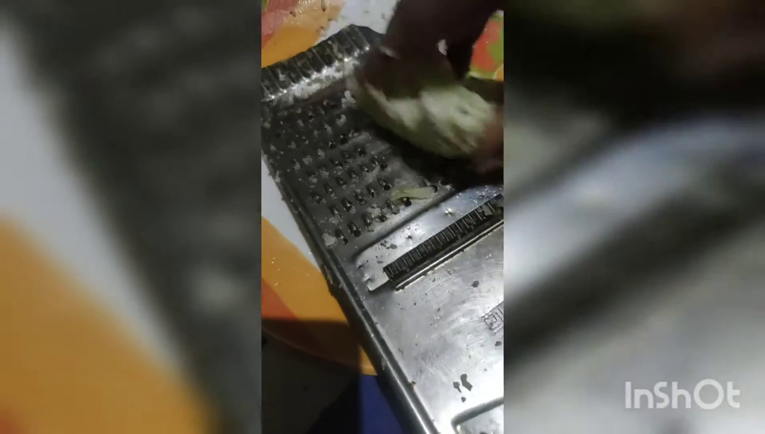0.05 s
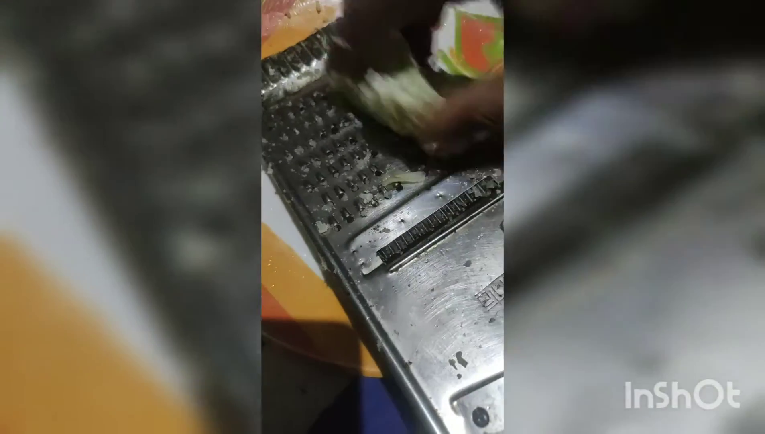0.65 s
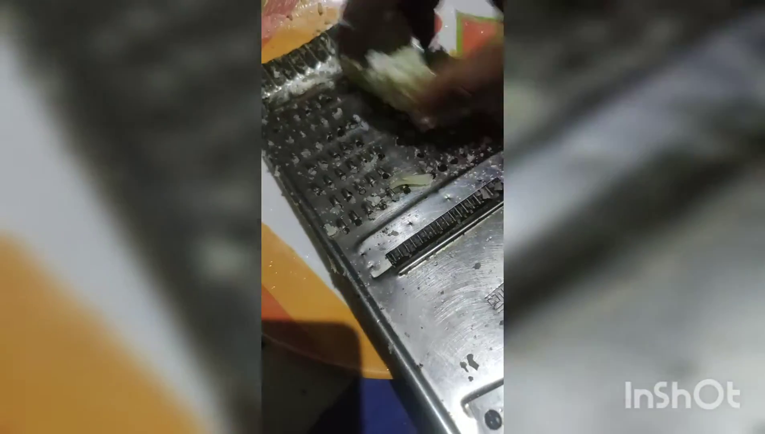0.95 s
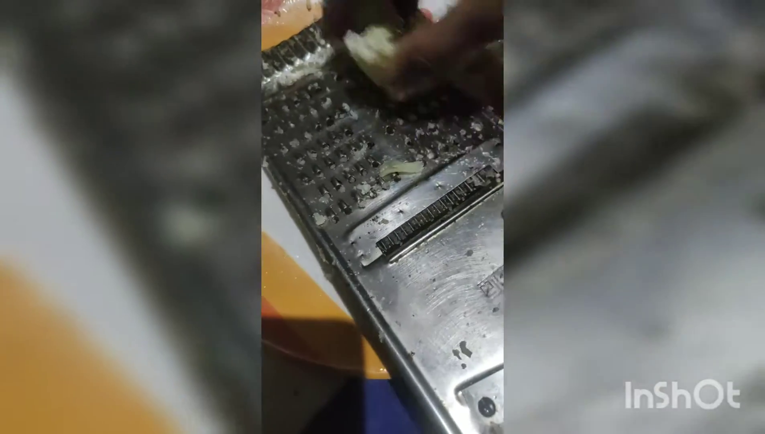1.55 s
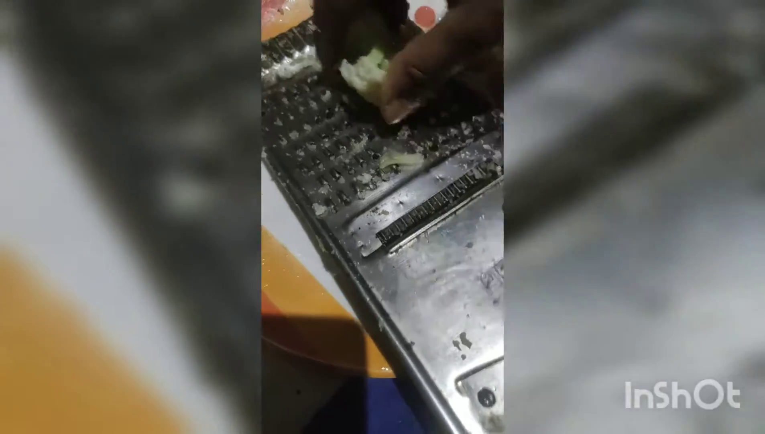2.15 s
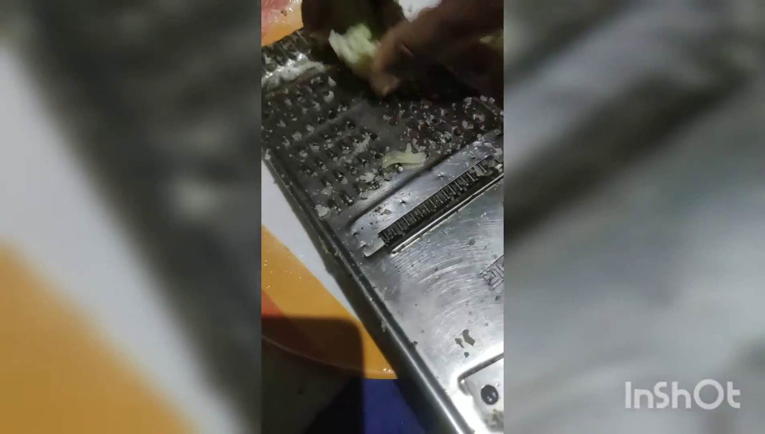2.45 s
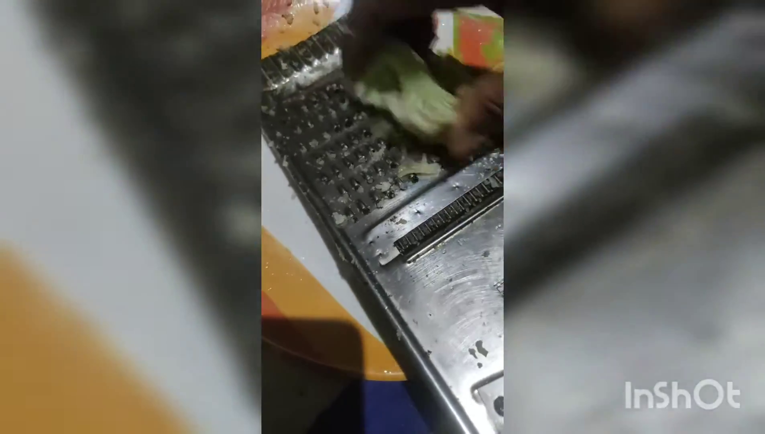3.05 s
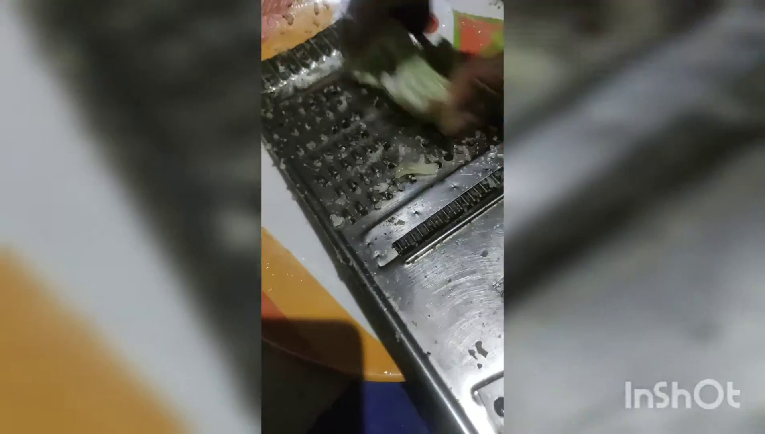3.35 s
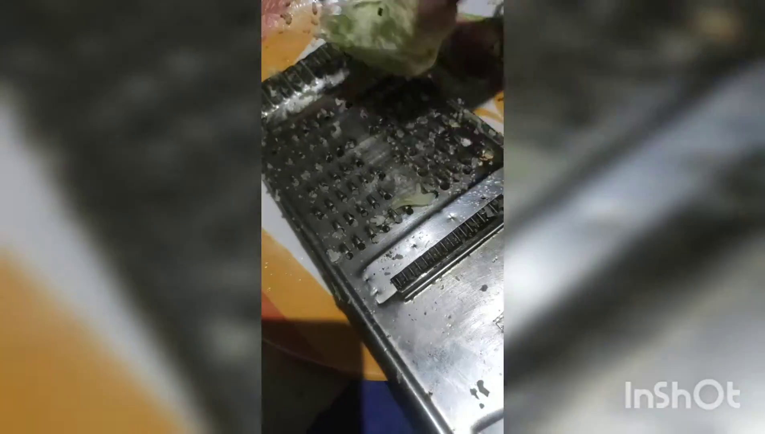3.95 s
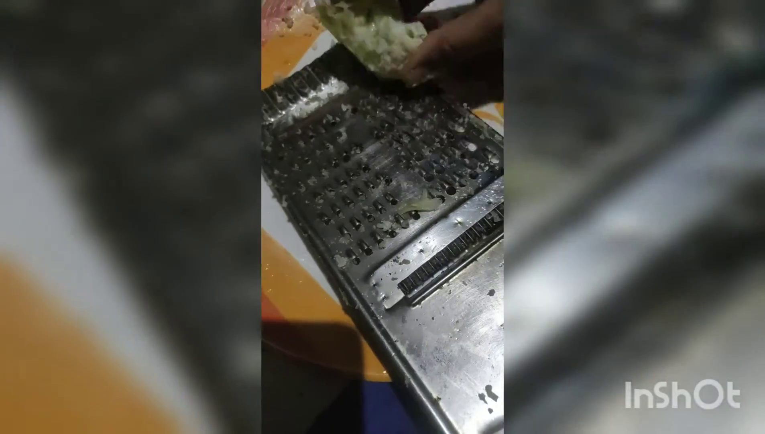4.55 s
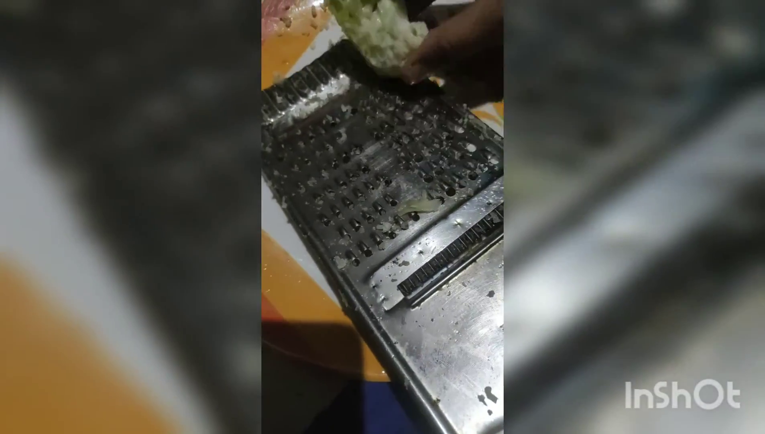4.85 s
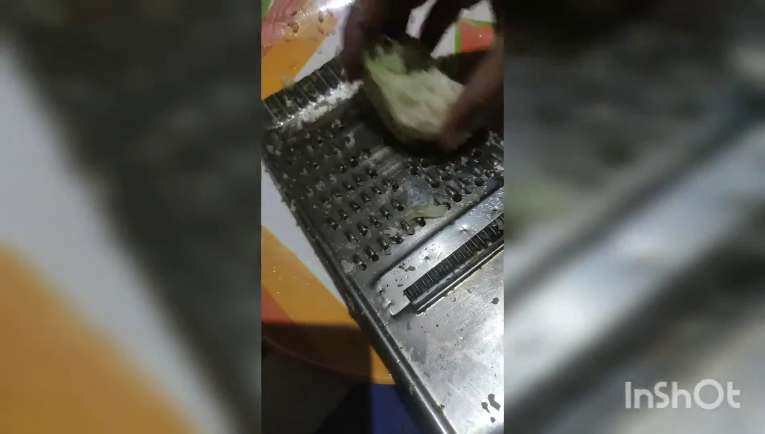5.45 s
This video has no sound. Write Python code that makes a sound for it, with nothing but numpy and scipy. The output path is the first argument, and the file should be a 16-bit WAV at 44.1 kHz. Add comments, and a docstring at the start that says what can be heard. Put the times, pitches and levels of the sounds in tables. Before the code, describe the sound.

Close, rhythmic scraping of a vegetable on a flat metal grater, with small snaps and soft thuds, pausing briefly twice.

```python
"""Loud rasping pushes and light returns, with two pauses: a firm vegetable on a flat steel grater, close by.
The teeth tear the flesh by brittle fracture, in dense clumps of tiny cracks that hiss and excite the
resonances of the steel sheet. Now and then a piece snaps off a tooth. The dragging force shakes the
grater on its support, and a small kitchen adds a short reverberation and faint noise."""
import sys
import numpy as np
from scipy import signal
from scipy.fft import rfft, irfft, next_fast_len
from scipy.io import wavfile
from scipy.ndimage import uniform_filter1d, map_coordinates

SR = 44100
rng = np.random.default_rng(int(sys.argv[2]) if len(sys.argv) > 2 else 0)


def unload_wav(signal):
    """Save mono or channel-first audio to the path in sys.argv[1] as 16-bit WAV at rate SR, clipped to [-1, 1]."""
    wavfile.write(
        sys.argv[1],
        SR,
        np.round(np.clip(np.atleast_2d(signal).T, -1, 1) * 32767).astype(np.int16),
    )


N = 246959


# Spectrum of the cracking flesh. Each row: frequency in Hz, relative spectral density in dB.
TEAR_SPECTRUM = [(500, -41), (1200, -11.5), (2200, -7.5), (3200, -1.5), (4000, -0.5), (4900, -2.5),
                 (5600, -3), (7500, -2), (11000, -3), (15800, -8.5)]
# Resonances of the steel sheet. Each row: frequency in Hz, bandwidth in Hz, relative gain in dB.
SHEET_MODES = [(483, 54, -12), (710, 45, -2.5), (834, 110, -4.5), (1130, 110, -2), (1460, 53, 2),
               (1896, 97, 0.5), (2210, 160, 1.5), (2450, 150, -3.5), (2726, 92, 1), (3090, 75, -8.5),
               (3710, 340, -1), (4420, 100, -4), (4700, 300, -3.5), (6240, 81, -13.5), (7320, 300, -5),
               (8260, 250, -9)]
# Spectrum of the dull rubbing. Each row: frequency in Hz, relative spectral density in dB.
DRAG_SPECTRUM = [(150, -28.5), (250, -12.5), (311, 4), (393, -17.5), (468, 1), (571, -14), (704, 1),
                 (830, -2.5), (1020, -11), (1230, -7.5), (1450, 4), (1650, -4), (2000, 0), (2600, -48.5),
                 (4400, -120)]

def grating(force, treble, ring, drag):
    """Stick-slip: teeth catch and let go in clumps of cracks that hiss, ring the sheet and drag it."""
    unsteady_db = 0.5 * wobble(32)
    catches = amp(0.78 * wobble(330) + 1.42 * wobble(110) + unsteady_db)
    tears = catches * fracture(force, lag_ms=0.22, lag_spread_ms=0.1, spread_db=3.5)
    flesh = roaming(coloured(tears, TEAR_SPECTRUM), depth_db=3.5)
    crunch = lowpassed(flesh, 7000)
    tearing = amp(-1.38) * (force * crunch + treble * (flesh - crunch))
    strikes = amp(3.3 * wobble(200)) * fracture(force, lag_ms=0.27, lag_spread_ms=0.04, spread_db=4)
    steel = amp(-0.83) * ring * roaming(ringing(strikes, SHEET_MODES), depth_db=4.5)
    grip = catches * amp(2.4 * wobble(170))
    slips = grip * fracture(force, lag_ms=0.2, lag_spread_ms=0.11, spread_db=5)
    rubbing = drag * roaming(coloured(slips, DRAG_SPECTRUM), depth_db=3.5)
    return shimmer(tearing + steel, ring_db=-5.5, t60=0.068) + shimmer(rubbing, ring_db=-3, t60=0.073)


# Cycles of the hand, a light return and then a push. Each row: push start in seconds, length in seconds,
# level in dB, hardest moment as a share of the length, offsets of treble, steel ring and drag in dB,
# level of the preceding return in dB.
STROKES = [(0.131, 0.13, -33, 0.41, -2.2, -1.5, 2.5, -51), (0.42, 0.15, -29.5, 0.28, 1.3, 0.5, 3.4, -47),
           (0.688, 0.17, -29, 0.5, 1, -1, 0.1, -42.5), (0.992, 0.15, -28.5, 0.39, 0.2, -0.7, 1.5, -43.5),
           (1.269, 0.17, -30.5, 0.43, 1, -1.7, 1.4, -45.5), (1.564, 0.18, -27.5, 0.4, 0, -3.2, -1.3, -43),
           (1.867, 0.16, -27, 0.39, 0.5, -1, -1.5, -41), (2.168, 0.13, -25.5, 0.36, -1.5, -4.7, -1.7, -40),
           (2.458, 0.18, -27, 0.41, 2.5, -0.2, -2, -43.5), (2.771, 0.23, -27.5, 0.38, 0.7, -0.8, -2, -39),
           (3.112, 0.16, -29, 0.39, 1.1, 1.1, -5.5, -39), (3.407, 0.14, -26.5, 0.39, 0.7, -1.5, -2.2, -41),
           (3.682, 0.15, -29, 0.51, -1, -2.5, 1.5, -44.5), (4.235, 0.14, -31.5, 0.4, 2, -1, 3, -67),
           (4.505, 0.17, -29.5, 0.51, -0.3, 0, 4, -50.5),
           (4.809, 0.16, -31.5, 0.45, -2.7, -2.5, 2.5, -43.5),
           (5.322, 0.16, -37, 0.53, -3.5, 2.3, 0, -69.5)]
# Spans in which the flesh never quite leaves the teeth. Each row: start and end in seconds.
CONTACT_SPANS = [(-.03, 3.86), (4.215, 5.0), (5.305, 5.49)]
# Offsets of (treble, steel ring, drag) from the level of the tearing.
PUSH_COLOUR_DB, RETURN_COLOUR_DB, LIFT_COLOUR_DB = (0.2, -5.5, -13.5), (-1.7, -4, -11.5), (4, -1, -18)
LIFT_STROKE = dict(start=3.79, length=0.42, crest=0.37, arch=(0.83, 1.9))  # leads into the first pause

def hand():
    """The driving force sets four gains over time: tearing, its treble, steel ring and drag."""
    def layers(db, colour_db, envelope):
        return np.outer(amp(db + np.array([0, *colour_db])), envelope)

    longest_return_s, overlap_s, rest_s, fade_s = 0.15, 0.0027, 0.01, 0.014
    t = np.arange(N) / SR
    touching = sum(np.clip(np.minimum(t - begin, end - t) / fade_s, 0, 1) for begin, end in CONTACT_SPANS)
    scuffing = amp(2.84 * wobble(45))  # the return skips unevenly over the teeth
    gains = layers(-55, LIFT_COLOUR_DB, swell(**LIFT_STROKE))
    free_at = -np.inf
    for start, length, db, crest, *offsets_db, return_db in STROKES:
        turn = max(free_at, start - longest_return_s)
        back = swell(turn, start + overlap_s - turn, crest=0.54, arch=(0.87, 0.61))
        gains += layers(return_db, RETURN_COLOUR_DB, scuffing * back)
        push = swell(start, length, crest, arch=(2.41, 1.666))
        bite = np.tanh(0.9 * push) / np.tanh(0.9)  # once the teeth are sunk in, more force adds little
        gains += layers(db, np.add(PUSH_COLOUR_DB, offsets_db), bite)
        free_at = start + length + rest_s
    return np.hypot(gains, layers(-55.5, RETURN_COLOUR_DB, touching))


def swell(start, length, crest, arch):
    """A force pulse peaks at the share crest of its length; the arch exponents sharpen (rise, fall)."""
    progress = np.clip((np.arange(N) / SR - start) / length, 0, 1)
    skew = np.log(0.5) / np.log(np.clip(crest, 0.1, 0.9))
    return np.abs(np.sin(np.pi * progress ** skew)) ** np.where(progress < crest, *arch)


def fracture(force, lag_ms, lag_spread_ms, spread_db):
    """Brittle fracture: cracks crowd under force; path differences delay each between two microphones."""
    per_second = 2500 + 11000 * np.sqrt(force / force.max())
    at = np.flatnonzero(rng.random(N) < per_second / SR)
    sign, size, place = rng.standard_normal((3, N))[:, at]
    size = np.sign(sign) * amp(spread_db * size) / np.sqrt(per_second[at])
    lag = (lag_ms + lag_spread_ms * place) * SR / 1000
    late = np.clip(np.rint(at + lag), 0, N - 1).astype(int)
    return unit(np.array([np.bincount(late, size, N), np.bincount(at, size, N)]))


def roaming(x, depth_db):
    """Modal coupling varies with position: the travelling contact favours now some modes, now others."""
    spectra = signal.stft(x, nperseg=1024)[2]
    field = uniform_filter1d(rng.standard_normal(spectra.shape), size=5, axis=1)
    field = uniform_filter1d(field, size=7, axis=2)
    field = unit(field + 2 * field.mean(axis=0))  # mostly alike in the two channels
    return unit(signal.istft(spectra * amp(depth_db * field), nperseg=1024)[1][:, :N])


def shimmer(x, ring_db, t60, count=5, shifts_per_s=3.54):
    """High modal density: thin steel rings like decaying noise, in a blend the damping hand shifts."""
    t = np.arange(SR // 6) / SR
    modes = rng.standard_normal((count, 2, len(t))) * amp(-60 * t / t60)
    modes /= np.linalg.norm(modes, axis=2, keepdims=True)
    rings = signal.fftconvolve(x[None], modes, axes=2)[..., :N]
    blend = np.array([wobble(shifts_per_s) for _ in range(count)])
    blend /= np.linalg.norm(blend, axis=0)
    ring = np.sum(rings * blend[:, None], axis=0)
    return (x + amp(ring_db) * ring) / np.hypot(1, amp(ring_db))


# Ring of the sheet's two lowest bands. Each row: time in seconds, hollow gain in dB, low gain in dB.
BAND_GAINS = [(.2, 1, 2), (1.1, 2.5, 1), (1.9, -2.5, 0.5), (2.8, -2, -1), (3.7, 0, 0.5), (4.6, 0, -6.5),
              (5.4, 2.5, 1.5)]

def hand_damping(x, hollow_hz=740, low_hz=363, half_width_octaves=0.58):
    """Damping depends on the place of the hand, which lets two low bands ring more or less."""
    def band(centre_hz):
        return filtered(x, lambda hz: np.exp(-(np.log2((hz + 1) / centre_hz) / half_width_octaves) ** 2))

    hollow_db, low_db = curves(BAND_GAINS)
    return x + (amp(hollow_db) - 1) * band(hollow_hz) + (amp(low_db) - 1) * band(low_hz)


# Teeth biting in or pieces snapping off. Each row: start in seconds, level in dB, treble gain in dB.
SNAPS = [(.228, -38, 2), (0.251, -30.5, 6.5), (.537, -24, -12), (.712, -28, 7.5), (1.472, -33.5, -9.5),
         (1.591, -28.5, -3), (2.187, -29.5, -4.5), (2.284, -29, 7.5), (2.381, -34, 5), (2.483, -32, -1),
         (2.789, -29, 5.5), (2.889, -28, -3), (3.140, -31.5, -3), (3.317, -34, -2), (3.333, -23.5, -6),
         (3.933, -46, -10), (4.418, -45, 6), (4.496, -29.5, -18), (4.726, -31.5, 11.5), (4.841, -27, 6.5),
         (5.232, -44, -13)]

def snaps(t60=0.032, rise_s=0.0015):
    """Sudden release of stress: a larger piece lets go in a short broadband burst."""
    out = np.zeros((2, N + SR))
    t = np.arange(SR // 20) / SR
    for start, db, treble_db in SNAPS:
        burst = rng.standard_normal((2, len(t))) * amp(-60 * t / t60) * (1 - np.exp(-t / rise_s))
        dull = signal.lfilter(*signal.butter(1, 7000, fs=SR), burst)
        crack = dull + amp(treble_db) * (burst - dull)
        out[:, round(start * SR):][:, :len(t)] += amp(db) * crack
    return lowpassed(out[:, :N], 15000)


# Resonances of the teeth. Each row: frequency in Hz, bandwidth in Hz, relative gain in dB.
TOOTH_MODES = [(3760, 49, -8), (5130, 210, 2), (5980, 120, 3)]

def brushed_teeth():
    """Weak impulses excite resonance: sliding off, the vegetable brushes the teeth and they sing thinly."""
    brushing = np.array([cracks(2700, spread_db=5), cracks(3000, spread_db=7)])
    return amp(-57) * swell(**LIFT_STROKE) * ringing(brushing, TOOTH_MODES)


# Slow sway of the support. Each row: frequency in Hz, relative spectral density in dB.
SWAY_SPECTRUM = [(15, -14.5), (28, -3.5), (45, -15.5), (59, -0.5), (78, -9), (120, -34), (300, -85)]
# Resonances of the support. Each row: frequency in Hz, bandwidth in Hz, relative gain in dB.
SUPPORT_MODES = [(112, 10, 11.5), (147.8, 53, 1.5), (180, 7.9, -16.5), (290, 14, -10)]
# Shudder under a full push, as the grip changes. Each row: time in seconds, level in dB.
SHUDDER_LEVELS = [(.2, -39), (1.1, -41), (1.7, -41), (2.2, -42.5), (3.3, -41.5), (3.8, -43), (4.6, -45.5),
                  (5.4, -39.5)]

def support(force, full_push_db=-28, lag_s=0.018):
    """Forced vibration: the dragging force shakes grater and table, up to a limit at a full push."""
    def slips():
        return lowpassed(cracks(900, spread_db=2), 450)

    t = np.arange(N) / SR
    load = np.minimum(force / amp(full_push_db), 1)
    sway = (amp(-60) + amp(-48.5) * load ** 0.35) * coloured(rng.standard_normal(N), SWAY_SPECTRUM)
    # The higher modes differ between the two channels.
    twist = amp(-12.5) * np.outer([1, -1], ringing(slips(), SUPPORT_MODES[1:]))
    late_load = np.interp(t - lag_s, t, load)
    shaking = amp(-70.5) + amp(curves(SHUDDER_LEVELS)[0]) * late_load ** 0.82
    return sway + shaking * (ringing(slips(), SUPPORT_MODES) + twist)


# Low thuds of the grater. Each row: centre in seconds, pitch in Hz, level in dB, half width in seconds.
ROCKS = [(0.216, 57.4, -42, 0.036), (.395, 54, -42.5, 0.036), (0.537, 54.9, -38, 0.045),
         (0.67, 60.2, -34, 0.03), (1.416, 111.1, -39.5, 0.028), (1.536, 62.4, -38.5, .03),
         (2.15, 66.1, -38.5, 0.032), (2.416, 55.2, -43, 0.043), (2.939, 90.8, -40, 0.012),
         (3.086, 113.6, -38, 0.014), (3.207, 158.3, -36, 0.012), (4.239, 56.3, -35, 0.0088),
         (4.333, 105, -36, 0.036), (4.49, 53.3, -41, 0.046), (4.753, 86.5, -34, .037),
         (4.899, 90, -34.5, 0.044), (5.43, 100, -36, .031)]

def rocking():
    """Transient oscillation: the grater rocks under the hand for a few cycles."""
    t = np.arange(N) / SR
    out = np.zeros(N)
    for centre, hz, db, half_width in ROCKS:
        envelope = amp(db) * np.exp(-((t - centre) / half_width) ** 2)
        out += envelope * np.sin(2 * np.pi * (hz * t + rng.random()))
    return out


# Decay of the kitchen. Each row: frequency in Hz, reverberation time in seconds.
KITCHEN_T60 = [(200, 0.18), (2000, 0.09), (12000, 0.037)]

def kitchen(x):
    """Reverberation: absorption rises with frequency, so the treble of the short tail dies first."""
    hz, t, spectra = signal.stft(rng.standard_normal((2, SR // 3)), SR, nperseg=256)
    decay = amp(-60 * t / along(KITCHEN_T60, hz)[:, None])
    tail = signal.istft(spectra * decay, SR, nperseg=256)[1]
    return signal.fftconvolve(x, tail / np.linalg.norm(tail[0]), axes=1)[:, :N]


# Background of the quiet kitchen. Each row: frequency in Hz, relative spectral density in dB.
ROOM_SPECTRUM = [(15, -34), (25, 1), (53, -4), (144, -33), (342, -23.5), (403, -21), (710, -30),
                 (8730, -37), (15800, -40)]

def room_noise():
    """Stationary noise, strongest in the bass and uncorrelated between the channels."""
    return amp(-58) * coloured(rng.standard_normal((2, N)), ROOM_SPECTRUM)


def cracks(per_second, spread_db):
    """A Poisson process: impulses at random moments and of random size."""
    impulses = (rng.random(N) < per_second / SR) * rng.standard_normal(N)
    return unit(impulses * amp(spread_db * rng.standard_normal(N)))


def ringing(x, modes):
    """Modal superposition: x through (Hz, bandwidth, dB) resonances, at rms 1."""
    def response(f):
        return sum(amp(db) * 1j * f * width / (hz * hz - f * f + 1j * f * width) for hz, width, db in modes)

    return unit(filtered(x, response))


def coloured(x, spectrum):
    """Spectral shaping of x by (Hz, dB) points, at rms 1."""
    return unit(filtered(x, lambda hz: amp(along(spectrum, hz))))


def lowpassed(x, cutoff_hz):
    """Zero-phase roll-off of 24 dB an octave."""
    return filtered(x, lambda hz: 1 / (1 + (hz / cutoff_hz) ** 4))


def filtered(x, response):
    """Linear filtering: the spectrum of x times a frequency response."""
    size = next_fast_len(N + SR // 2)
    return irfft(rfft(x, size) * response(np.fft.rfftfreq(size, 1 / SR)), size)[..., :N]


def wobble(rate):
    """Smooth random modulation with rate knots a second."""
    return map_coordinates(rng.standard_normal(int(N * rate / SR) + 4), [np.arange(N) * rate / SR])


def curves(rows):
    """Linear interpolation, at every sample, of each column after the time."""
    times, *columns = np.transpose(sorted(map(tuple, rows)))
    return [np.interp(np.arange(N) / SR, times, column) for column in columns]


def along(points, hz):
    """Interpolation of (Hz, value) points on a logarithmic frequency axis."""
    knots_hz, values = np.transpose(points)
    return np.interp(np.log(hz + 1), np.log(knots_hz + 1), values)


def unit(x):
    """Normalisation to rms 1."""
    return x / np.sqrt(np.mean(x ** 2) + 1e-20)


def amp(db):
    """Decibels to amplitude ratio."""
    return 10 ** (np.asarray(db) / 20)


# Stereo balance of the grater. Each row: frequency in Hz, left minus right level in dB.
BALANCE = [(100, -6), (200, 13.5), (330, -7.5), (600, 0), (1400, -0.6), (2400, 0.5), (4600, 3.5),
           (7000, 2.5), (10000, 3.5), (15000, 10.5)]

def scene():
    """Superposition: the grater, brighter on the left, over its shaking support and the room."""
    force, treble, ring, drag = hand()
    grater = hand_damping(grating(force, treble, ring, drag)) + snaps() + brushed_teeth()
    grater = filtered(grater, lambda hz: amp(np.outer([0.5, -0.5], along(BALANCE, hz))))
    background = room_noise()
    return grater + amp(-15) * kitchen(grater) + support(force) + rocking() + background


def record(dry, top_hz=15900):
    """Gating and band limiting: the sound stops just before the end and loses its highest treble."""
    gate = np.interp(np.arange(N) / SR, [5.485, 5.505], [1, 0])
    return filtered(dry * gate, lambda hz: np.clip((top_hz - hz) / 300 + 0.5, 0, 1))


dry = scene()
out = record(dry)
unload_wav(out)
```